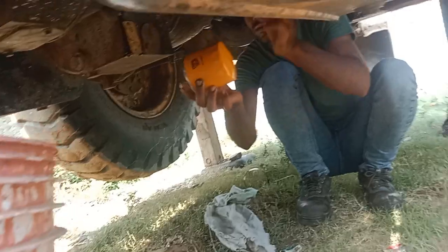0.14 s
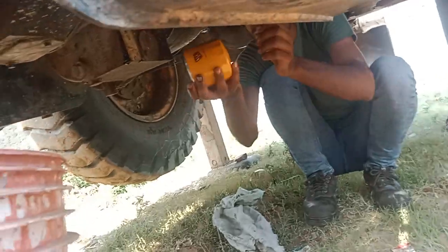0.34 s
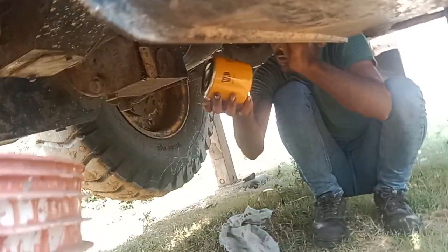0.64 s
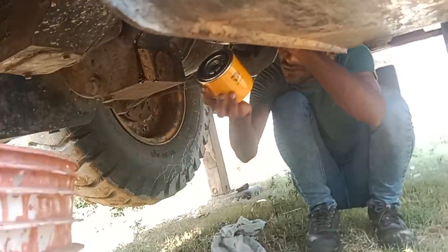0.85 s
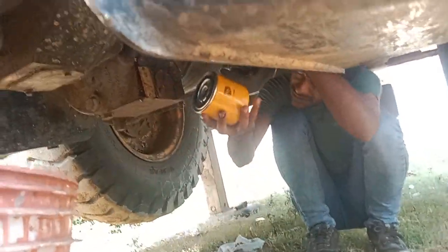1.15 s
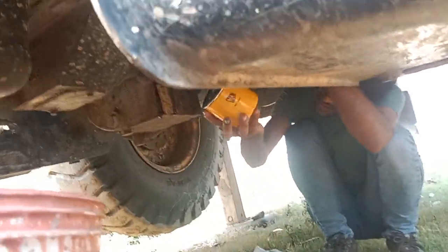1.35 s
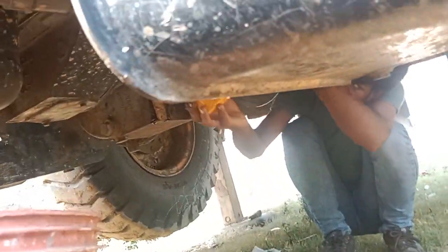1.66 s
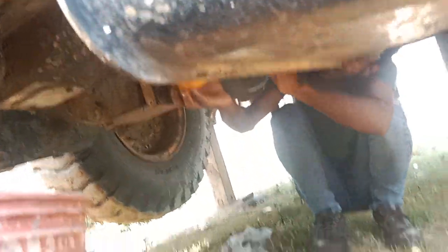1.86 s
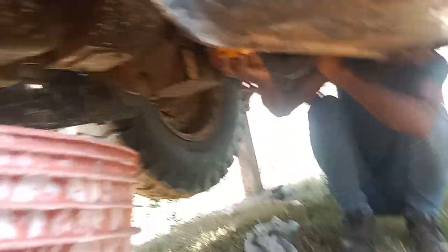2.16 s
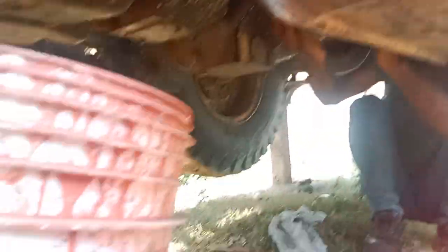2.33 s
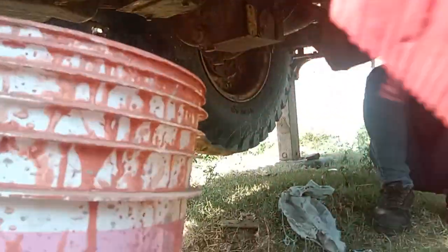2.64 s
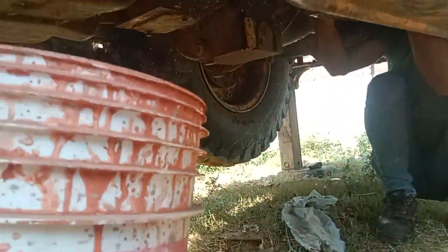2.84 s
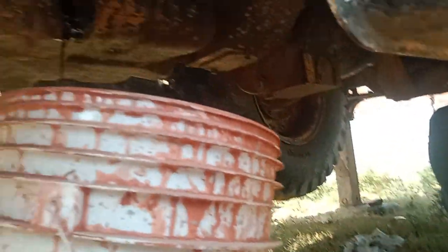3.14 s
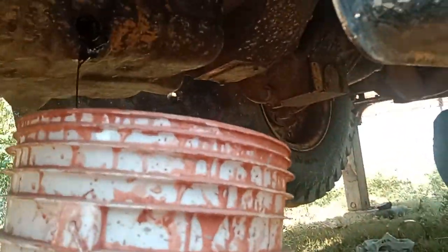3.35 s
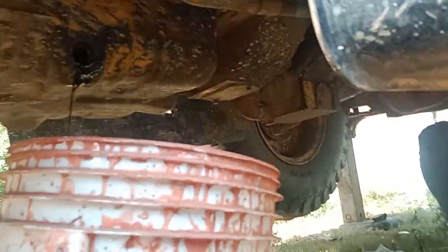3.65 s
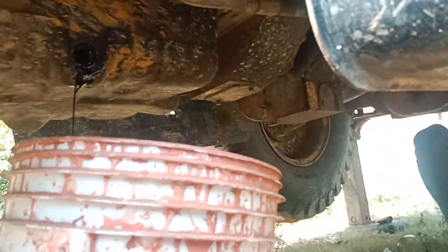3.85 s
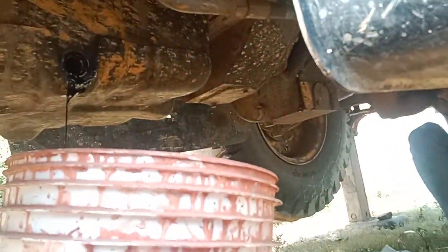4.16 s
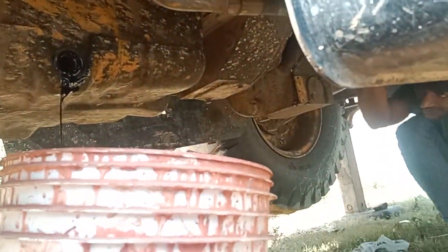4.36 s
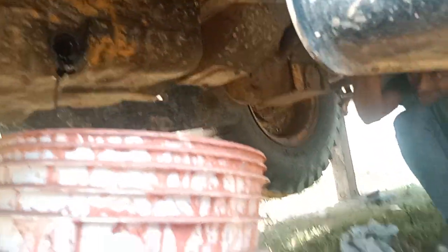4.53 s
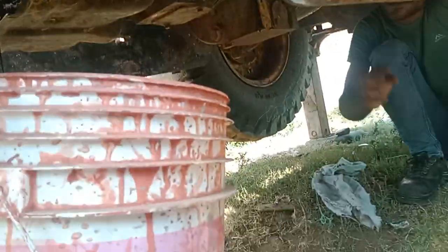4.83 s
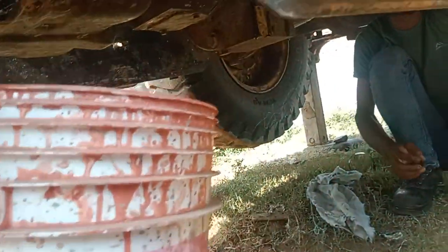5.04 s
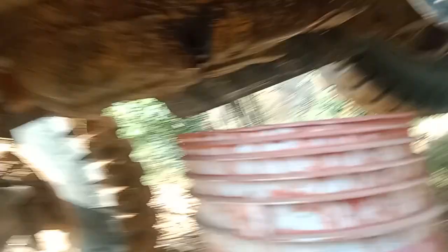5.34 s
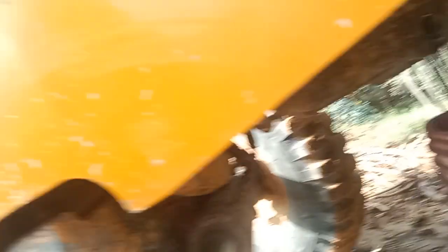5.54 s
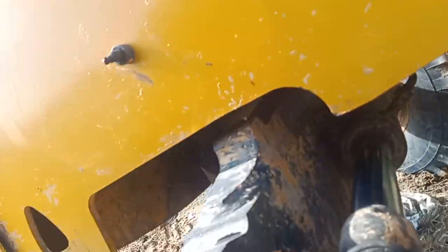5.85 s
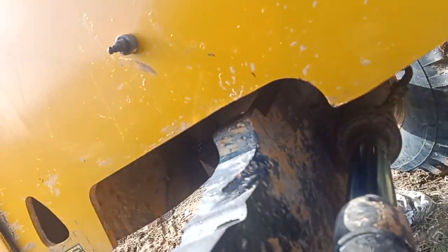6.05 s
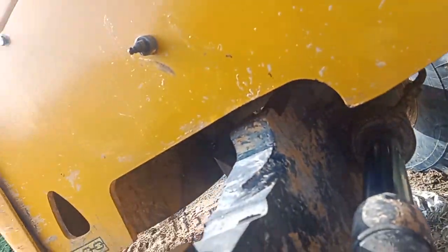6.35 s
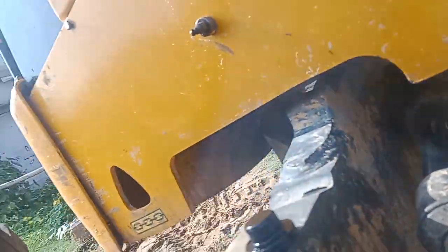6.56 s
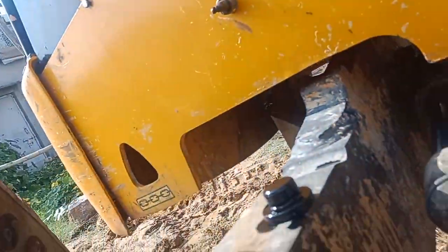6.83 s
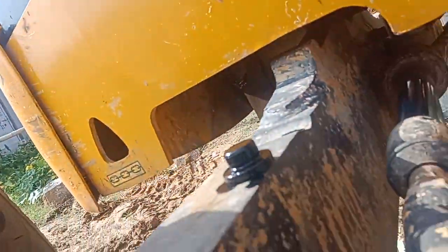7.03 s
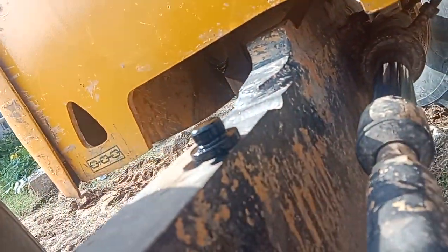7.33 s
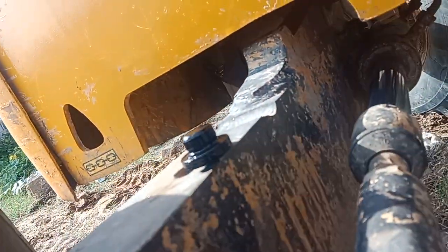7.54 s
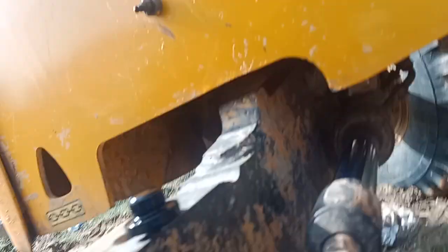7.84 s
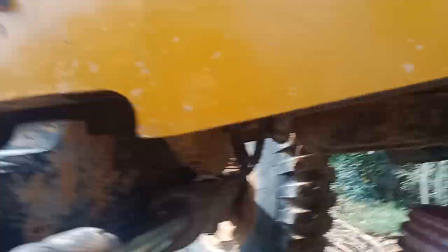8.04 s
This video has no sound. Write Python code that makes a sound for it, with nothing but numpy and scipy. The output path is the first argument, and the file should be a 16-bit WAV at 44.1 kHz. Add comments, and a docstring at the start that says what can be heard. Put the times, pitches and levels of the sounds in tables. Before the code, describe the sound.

Outdoors beneath a digger, heard by a hand-held phone with dulled treble and patchy quiet noise. Low, unsteady air rumble runs throughout, under faint high insect hiss. Cloth and grass swish at 0.2 and 0.6 s, with thin whistles coming and going until 1.7. Loud steel clanks hit at 1.0 and 1.35 s, crashing sharply then ringing with a short dull echo. A low engine-like hum swells around 2 s. At 2.7-2.9 a close sleeve rubs and fingers bump the case. A small knock follows at 3.2; very faint oil plips are nearest around 3.6, while the air flutter weakens. From 5.1 dry crackles and clicks gather; light knocks, hoarse scrapes and a loose steel clack come at 5.7-6.3. A soft thump at 7.0, a gritty grip slide near 7.6, then gusts and heavy double thumps at 8.0-8.2.

```python
"""Outdoors under a digger, a hand-held phone hears a thin thread of engine oil patter into a plastic bucket.
Steel clanks twice as a filter is fitted (decaying modes over a noise crash); small things knock, and the steel
clacks lightly after a short scrape. A close sleeve rubs, cloth and grass swish, dry stalks crackle: shaped
noise and clicks. Fingers thump the case near the end. Air buffets the microphone all along as wandering
resonances, a low hum swells, thin wavering whistles come and go, and insects hiss in a high noise band."""
import sys
import numpy as np
from scipy import signal
from scipy.fft import rfft, irfft, dct, next_fast_len
from scipy.io import wavfile
from scipy.ndimage import uniform_filter1d

SR = 44100
rng = np.random.default_rng(int(sys.argv[2]) if len(sys.argv) > 2 else 0)


def output_pcm(signal):
    """Save a mono or channel-first signal as 16-bit PCM at the path in sys.argv[1].

    Samples are clipped to [-1, 1] before scaling.
    """
    pcm = np.clip(np.atleast_2d(signal).T, -1, 1) * 32767
    wavfile.write(sys.argv[1], SR, np.round(pcm).astype(np.int16))


N = 361205
TIME = np.arange(N) / SR  # seconds

# Steel under the machine. Each row: frequency in Hz, 60 dB decay in s, then relative level in dB
# when struck at the first spot and at the second.
STEEL_MODES = [(554,0.55,-25,-38), (590,0.34,-23,-30), (684,0.12,-28,-28), (827,0.2,-35,-30),
               (980,0.11,-18,-22), (992,0.5,-27,-32), (1354,1.5,-25.5,-35), (1564,0.33,-25,-39),
               (1628,0.16,-27,-39), (1677,0.28,-28,-42), (1795,0.19,-30,-43), (1930,0.18,-25,-44),
               (2358,0.25,-44,-33), (2494,0.5,-28,-42), (2560,0.17,-33,-23), (3076,0.27,-48,-25.5),
               (3574,0.165,-25,-35), (4182,0.17,-35,-40), (4370,0.19,-34,-44), (4830,0.09,-32,-37),
               (5765,0.13,-42,-35), (7020,0.11,-47,-34)]
# The two blows. Each row: start in seconds, ring gain in dB, crash level in dB, crash 60 dB decay in s.
CLANKS = [(0.9836, -0.5, -7, 0.039), (1.3505, 1.5, -15, 0.087)]
# Dense, short modes, one list for each spot struck. Each row: frequency in Hz, relative level in dB.
CRASH_COLOURS = [
    [(250, -38), (600, -19.5), (1000, 10.5), (1250, -17), (1800, -2), (2700, -22), (3700, -6.5),
     (5500, -19.5), (8200, -25)],
    [(250, -32.5), (650, 7.5), (1000, -1.5), (1500, -9.5), (2100, -18.5), (2700, -3.5), (3700, -7.5),
     (5500, -10.5), (8200, -21)],
]
CLANK_RISE_S = 0.0016

# Thumps on the phone's case. Each row: start in seconds, level in dB, frequency in Hz, 60 dB decay in s.
THUMPS = [(2.837, -9.5, 159, 0.033), (2.865, -9, 225, 0.027), (2.874, -16.5, 115, 0.079),
          (6.978, -17, 144, 0.078), (8.035, -2, 198, 0.041), (8.049, -4, 233, 0.027),
          (8.141, -2.5, 320, 0.016), (8.159, -9, 166, 0.03)]

# Tools and bucket knocked, and the steel bouncing once after its clack. Each row: start in seconds, level in
# dB, body frequency in Hz, body 60 dB decay in s, bright clatter in dB relative to the knock.
KNOCKS = [(1.892, -39, 943, 0.25, -10.5), (2.677, -29.5, 1046, 0.11, -22.5), (3.222, -25, 900, 0.046, -0.5),
          (5.735, -36, 1123, 0.12, -8), (5.972, -32, 583, 0.17, -9.5)]
# The steel clacks at a light blow. Each row: start in seconds, level in dB.
CLACKS = [(5.9515, -34.5)]
# Modes the steel rings with at a light blow or a bright knock. Each row: frequency in Hz, relative level in dB,
# 60 dB decay in s.
CLATTER_MODES = [(588.4, -0.5, 0.28), (674, -11, 0.15), (987, 0, 0.16), (1335, -5.5, 0.38),
                 (2470, -18.5, 0.14), (4120, -12.5, 0.4), (4280, -19, 0.28), (4500, -12, 0.31),
                 (5740, -10.5, 0.078), (6430, -2, 0.065), (7780, -13, 0.072)]
# Hoarse scrapes. Each row: start and end in seconds, first and last frequency in Hz, width in Hz, level in dB.
SCRAPES = [(5.73, 5.836, 1610, 1340, 200, -50.5), (5.74, 5.916, 1158, 1280, 110.5, -51.5),
           (5.835, 6.116, 3490, 3340, 170.6, -57), (6.163, 6.342, 1305, 1276, 70, -48),
           (6.875, 7.14, 1330, 1270, 70, -54.5), (3.446, 3.581, 895, 808, 77.7, -50)]

# The close sleeve catches on the phone, drags and slips off. Each row: start in seconds, drag in seconds,
# level of the dull rub in dB, level of the rasp in dB.
SLEEVE_DRAGS = [(2.735, 0.03, -37.5, -54.5), (2.775, 0.061, -38.5, -47), (2.831, 0.026, -35, -46.5),
                (2.881, 0.028, -53, -41)]
# Colours of the dull rub and of the rasp. Each row: frequency in Hz, relative level in dB.
RUB_COLOUR = [(300, -5.5), (420, -5.5), (800, -16), (1500, -25.5)]
RASP_COLOUR = [(900, -10), (1500, 1.5), (3000, 0), (8200, -9)]
SLEEVE_ATTACK_S, SLEEVE_T60_S = 0.0033, 0.22
# Shuffling near the phone. Each row: middle in seconds, length in seconds, level in dB.
MOVES = [(1.3, 2.9, -58), (2.638, 0.29, -53), (3.165, 0.61, -57.5), (6.09, 0.67, -53), (6.995, 0.85, -64)]
STILL_DB = -70.5  # rustle between the moves
# Resonances of the shuffling. Each row: frequency in Hz, width in Hz, relative level in dB.
RUSTLE_MODES = [(1298, 77, 1.5), (1400, 600, 0), (2607, 500, -6), (3470, 400, -4.5), (7300, 990, -7)]
# The grip slides on the case. Each row: middle in seconds, length in seconds, level in dB.
SLIDES = [(7.6, 0.43, -50.5), (8.08, 0.51, -54.5)]
# Resonances of that slide. Each row: frequency in Hz, width in Hz, relative level in dB.
SLIDE_MODES = [(450, 170, -6), (1031, 42, -5.5), (1490, 470, 4), (2460, 350, -2.5), (3440, 900, -8.5),
               (5240, 380, -7.5), (6880, 500, -11)]
# Cloth and grass brush past. Each row: middle in seconds, length in seconds, level in dB, lower edge in Hz.
SWISHES = [(0.197, 0.45, -55.5, 4000), (0.641, 0.36, -47.5, 2030), (1.959, 0.14, -51.5, 2000),
           (2.107, 0.074, -53, 2000), (4.815, 0.042, -52.5, 3540), (5.259, 0.082, -53.5, 3900),
           (6.178, 0.056, -48.5, 1980)]
# Colour of the swishes. Each row: frequency in Hz, relative level in dB.
SWISH_COLOUR = [(3000, 6.5), (4600, 3.5), (7000, 7), (8400, 4), (15000, -10.5)]

# Grit and dry stalks underfoot. Each row: start in seconds, level in dB, centre in Hz.
CRACKLES = [(0.3418, -44, 3160), (0.515, -45, 6440), (0.5601, -52, 2690), (2.36, -47, 7000),
            (2.6437, -49.5, 3320), (3.321, -53, 3370), (5.139, -47.5, 8000), (5.172, -49, 7400),
            (5.1951, -56, 4500), (5.307, -51, 2570), (5.5718, -45.5, 7330), (5.618, -48, 2250),
            (5.6383, -53, 2060), (5.731, -40, 2530), (5.998, -54, 4040), (6.065, -47, 3890),
            (6.338, -51.5, 3860), (6.442, -46.5, 3590), (6.9494, -47, 4210), (7.095, -38.5, 3470),
            (7.119, -53, 2590), (7.255, -47.5, 2370), (7.602, -46, 6750)]
# Sharp, broad clicks of things handled. Each row: start in seconds, level in dB.
CLICKS = [(0.39, -38), (2.836, -41), (5.3158, -38), (6.16, -46)]
# Colour of clicks and of bright knocks. Each row: frequency in Hz, relative level in dB.
TICK_COLOUR = [(1200, -1.5), (3000, 3.5), (8200, 0.5), (15000, -0.5)]
TICK_T60_S = 0.12
TICKING_DB = -51.5  # the strongest ticks of dry grass

OIL_DB, OIL_HZ = -69.5, 1060  # level before the bucket's distance is applied, middle pitch

# Eddies round the phone, deepest first. Each row: frequency in Hz, width in Hz, relative level in dB.
BASS_EDDIES = [(51.7, 15, -21), (90.8, 20, 2)]
LOW_EDDIES = [(128.3, 18, 0.5), (165.5, 29, -1), (214.7, 30, -9.5)]
HIGH_EDDIES = [(260.7, 36, 0.5), (303, 22, 0.5), (347, 50, -4), (392, 26, -15.5), (525, 230, -13.5)]
# Levels of the deepest and of the highest eddies between gusts. Each row: time in seconds, level in dB.
BASS_LEVEL = [(0, -46.5), (1.1, -38.5), (3, -42.5), (4.6, -46), (5.8, -40.5), (8.19, -36.5)]
FLUTTER_LEVEL = [(0, -40), (1.4, -39), (1.8, -42), (2.6, -40.5), (3.2, -46), (4.3, -53), (5.45, -51.5),
                 (6.6, -62), (7.7, -54), (8.19, -44.5)]
BREEZE_DB = -35.5  # low eddies between gusts
# Gusts. Each row: middle in seconds, length in seconds, rise in dB.
GUSTS = [(7.746, 0.17, 8.5), (8.036, 0.2, 15), (8.163, 0.044, 10)]
# Lulls. Each row: middle in seconds, length in seconds, drop in dB.
LULLS = [(1.744, 0.07, 7.5), (4.368, 0.077, 14.5), (4.585, 0.26, 6.5), (4.864, 0.17, 8.5),
         (5.097, 0.23, 7.5), (7.181, 0.13, 4), (7.868, 0.25, 10.5)]
FLUTTER_SWING = 1.21  # dB the high eddies move for each dB of a gust or lull
# Broad, soft wash of air. Each row: frequency in Hz, relative level in dB.
WASH_COLOUR = [(300, -4.5), (430, 3), (520, 1.5), (620, -8), (700, -24), (820, -14.5), (1100, -21),
               (2000, -32.5)]
WASH_DB = -41  # when the high eddies are at their strongest, between gusts
WASH_SWING = 2.9  # dB the wash moves for each dB of FLUTTER_LEVEL

DRONE_S, DRONE_LENGTH_S, DRONE_HZ = 1.99, 1.9, 46.66  # middle, length, fundamental of the low hum
# Partials of the hum. Each row: multiple of the fundamental, level in dB.
DRONE_PARTIALS = [(1, -43.5), (4, -38)]

# Thin whistles and squeaks. Each row: start and end in seconds, first and last frequency in Hz, level in dB.
WHISTLES = [(-.06, 0.104, 5500, 5480, -52.5), (0.084, 0.322, 5540, 5540, -57),
            (0.245, 1.1, 2670, 2667, -51), (0.256, 0.41, 3109, 3100, -52), (0.626, 0.96, 3095, 3046, -54.5),
            (1.212, 1.671, 2720, 2670, -48.5), (1.24, 1.673, 3150, 3110, -57.5),
            (5.849, 5.982, 2960, 2920, -51.5), (6.607, 7.172, 5860, 5620, -61),
            (6.666, 6.954, 3090, 3120, -63.5)]

# Quiet open air. Each row: frequency in Hz, relative level in dB.
AIR_COLOUR = [(400, -9.5), (750, -2), (1300, 4), (1900, -5.5), (3300, -8.5), (5500, -6.5), (8400, -21.5),
              (15000, -13.5)]
AIR_DB = -69
# Insects over time, before their trim. Each row: time in seconds, level in dB.
INSECT_LEVEL = [(0, -59.5), (1.2, -52), (1.6, -66.5), (2.6, -57), (3.3, -61.5), (3.8, -71), (6.1, -63.5),
                (8.19, -63)]
# Colour of the insects. Each row: frequency in Hz, relative level in dB.
INSECT_COLOUR = [(5500, -66.5), (6700, 25.5), (7400, 21.5), (8400, 16.5), (9200, -38)]

# Treble response of the microphone. Each row: frequency in Hz, gain in dB.
MIC_SHELF = [(8400, 0), (9400, -13.5)]
TOP_HZ = 15500  # nothing much is passed above this
RAGGED_DB = 9  # reach of chance resonances in a colour, up and down


def clanks(tail_db=-20, tail_t60=0.52, dull_hz=1800, dull_db=-11):
    """Each blow rings the steel modes as weighted by its spot, over a crash with a duller chassis echo."""
    out, t = np.zeros(N), TIME[:int(1.5 * SR)]
    rise = 1 - np.exp(-t / CLANK_RISE_S)
    for spot, (start, ring_db, crash_db, t60) in enumerate(CLANKS):
        ring = 0
        for hz, life, *db in STEEL_MODES:
            chatter = 1 + min(hz / 5000, 1) * walk(160)[:len(t)]  # upper modes are the most uneven
            tone = np.sin(2 * np.pi * (hz * t + rng.random()))
            ring = ring + undb(db[spot]) * fade(t, life) * chatter * tone
        # the echo loses dull_db for each octave above dull_hz
        dull = [(hz, db + dull_db * max(np.log2(hz / dull_hz), 0)) for hz, db in CRASH_COLOURS[spot]]
        echo = undb(tail_db) * noise(dull, size=len(t), ragged_db=RAGGED_DB) * fade(t, tail_t60)
        crash = noise(CRASH_COLOURS[spot], size=len(t)) * fade(t, t60) + echo
        add(out, start, (undb(ring_db) * ring + undb(crash_db) * crash) * rise)
    return out


def thumps(rise_s=0.0027):
    """Fingers bump the phone's case: each bump is a few cycles of a damped low tone."""
    out, t = np.zeros(N), TIME[:SR // 4]
    rise = 1 - np.exp(-t / rise_s)
    for start, db, hz, t60 in THUMPS:
        add(out, start, undb(db) * np.sin(2 * np.pi * hz * t) * fade(t, t60) * rise)
    return out


def knocks(tail_db=-22, tail_t60=0.48, hiss_db=-11, rise_s=0.0025):
    """A damped body resonance with bright metal clatter and a short echo; the steel also clacks alone."""
    out, t = np.zeros(N), TIME[:SR // 2]
    attack = 1 - np.exp(-t / rise_s)
    for start, db, hz, t60, bright_db in KNOCKS:
        body_colour = [(hz * .5, -22), (hz * .85, -7), (hz, 0), (hz * 1.08, -9), (hz * 2.5, -32)]
        body = noise(body_colour, size=len(t))
        hiss = undb(hiss_db + bright_db) * noise(TICK_COLOUR, size=len(t))
        blow = (body + hiss) * (fade(t, t60) + undb(tail_db) * fade(t, tail_t60))
        metal = undb(bright_db) * clatter(t, hz) * fade(t, 2 * t60)
        add(out, start, undb(db) * attack * (blow + metal))
    for start, db in CLACKS:
        add(out, start, undb(db) * attack * clatter(t))
    return out


def clatter(t, lowest_hz=0, rough=0.66):
    """Metal struck lightly rings unevenly in its modes; a glancing touch wakes only upper ones."""
    out = 0
    for hz, db, t60 in CLATTER_MODES:
        if hz > lowest_hz:
            rattle = 1 + rough * walk(260)[:len(t)]
            out = out + undb(db) * fade(t, t60) * rattle * np.sin(2 * np.pi * (hz * t + rng.random()))
    return out


def scrapes():
    """Short, hoarse slides: friction noise in one resonance that glides."""
    out = 0
    for start, end, first_hz, last_hz, width_hz, db in SCRAPES:
        progress = np.clip((TIME - start) / (end - start), 0, 1)
        phase = 2 * np.pi * np.cumsum(first_hz + (last_hz - first_hz) * progress) / SR
        band = walk(2 * width_hz) * np.cos(phase) + walk(2 * width_hz) * np.sin(phase)
        out = out + undb(db) * np.sin(np.pi * progress) * band
    return out


def rustles(flicker_db=5):
    """Fibres catch and slip: shuffling, and one close sleeve with a dull rub and a rasp."""
    shuffle = resonant(RUSTLE_MODES, flicker_db, rate=24) * effort()
    rub_level = sum(undb(db) * drag(start, length) for start, length, db, _ in SLEEVE_DRAGS)
    rasp_level = sum(undb(db) * drag(start, length) for start, length, _, db in SLEEVE_DRAGS)
    rub = noise(RUB_COLOUR) * rub_level
    rasp = grit(RASP_COLOUR, spread_db=1, rate=9500) * rasp_level
    grain_db = 2.5 * walk(220)
    return shuffle + (rub + rasp) * undb(grain_db)


def effort():
    """Strength of the shuffling: separate moves over near stillness, added as powers."""
    moves_power = sum((undb(db) * swell(middle, length)) ** 2 for middle, length, db in MOVES)
    return np.sqrt(undb(STILL_DB) ** 2 + moves_power)


def drag(start, length):
    """Strength of one drag: cloth catches quickly, drags evenly and dies away."""
    t = np.maximum(TIME - start, 0)
    return (1 - np.exp(-t / SLEEVE_ATTACK_S)) * fade(np.maximum(t - length, 0), SLEEVE_T60_S)


def slide(flicker_db=3):
    """The grip slides on the case: sets of narrow resonances come and go inside the broad ones."""
    rubbing = resonant(SLIDE_MODES, flicker_db, rate=18)
    flat = [(300, 0), (9000, 0)]
    sets = np.array([tint(rubbing, flat, RAGGED_DB * .7) for _ in range(6)])
    shares = np.array([np.exp(2 * walk(14)) for _ in sets])
    blend = (sets * shares).sum(axis=0) / shares.sum(axis=0)
    return blend * sum(undb(db) * swell(middle, length) for middle, length, db in SLIDES)


def swishes():
    """Cloth and grass brush past in grains; each stroke has its own resonances and lower edge."""
    out = 0
    for middle, length, db, low_hz in SWISHES:
        colour = [(low_hz * .5, -20)]
        for hz, weight in SWISH_COLOUR:
            octaves_below = max(np.log2(low_hz / hz), 0)
            colour.append((hz, weight - 40 * octaves_below))
        grains = grit(colour, spread_db=-6, rate=2700, ragged_db=RAGGED_DB / 2)
        out = out + grains * undb(db) * swell(middle, length)
    catching_db = 2 * walk(55)
    return out * undb(catching_db)


def crackles(tick_db=-10, count=100):
    """Snaps underfoot, sharp clicks of handling, and dry grass ticking finely at chance moments."""
    out, t = np.zeros(N), TIME[:SR // 8]
    for start, db, hz in CRACKLES:
        add(out, start, undb(db) * snap(hz))
    for start, db in CLICKS:
        click = noise(TICK_COLOUR, size=len(t), ragged_db=RAGGED_DB) * fade(t, TICK_T60_S)
        add(out, start, undb(db) * click)
    for when, pitch, weakness in rng.random((count, 3)):
        hz = 6800 + 1400 * pitch
        add(out, when * N / SR, undb(TICKING_DB + tick_db * weakness) * snap(hz, t60=0.081))
    return out


def snap(hz, t60=0.14):
    """A stalk or grain of grit snaps: a brief main resonance among weaker ones of its own."""
    t = TIME[:SR // 8]
    rise_s = .0009
    colour = [(hz * .5, -33), (hz * .85, -16), (hz, 0), (hz * 1.12, -15), (hz * 1.6, -33)]
    return noise(colour, size=len(t), ragged_db=RAGGED_DB) * fade(t, t60) * (1 - np.exp(-t / rise_s))


def oil(count=1600, t60=0.0058):
    """The viscous thread folds into the pool with tiny damped plips, loudest while the bucket is close."""
    out, t = np.zeros(N), TIME[:SR // 20]
    for when, pitch, weakness in rng.random((count, 3)):
        hz = OIL_HZ * 2 ** (1.2 * (pitch - .5))
        add(out, when * N / SR, undb(-14 * weakness) * np.sin(2 * np.pi * hz * t) * fade(t, t60))
    nearness = 0.23 + 1.1 * np.exp(-((TIME - 3.6) / 1.7) ** 2)  # closest at 3.6 s
    return out / np.std(out) * undb(OIL_DB) * nearness


def buffet(unrest_db=2.5):
    """Air rumbles on the microphone port under a soft wash; gusts swell it and reach higher, lulls drop it."""
    rise_db = sum(db * swell(middle, length) for middle, length, db in GUSTS)
    drop_db = sum(db * swell(middle, length) for middle, length, db in LULLS)
    gust_db = rise_db - drop_db
    flutter_db = curve(FLUTTER_LEVEL)
    weak_db = flutter_db - flutter_db.max()
    fitful_db = unrest_db * walk(7.6) * np.tanh(-weak_db / 10)  # weak eddies come and go
    bass = eddies(BASS_EDDIES) * undb(curve(BASS_LEVEL) + gust_db)
    low = eddies(LOW_EDDIES) * undb(BREEZE_DB + gust_db)
    high = eddies(HIGH_EDDIES) * undb(flutter_db + FLUTTER_SWING * gust_db + fitful_db)
    wash = noise(WASH_COLOUR) * undb(WASH_DB + WASH_SWING * weak_db + gust_db)
    return bass + low + high + wash


def eddies(modes, even_s=.07):
    """Turbulence whose pitch wanders while its strength stays even over a short while."""
    x = resonant(modes, flicker_db=4.5, rate=12)
    return x / np.sqrt(uniform_filter1d(x ** 2, int(even_s * SR)) + 0.066)


def drone(waver=0.025):
    """A low, wavering hum of a few partials, like a far engine, swells and fades."""
    phase = 2 * np.pi * np.cumsum(DRONE_HZ * (1 + waver * walk(8))) / SR
    hum = sum(undb(db) * np.sin(round(multiple) * phase) for multiple, db in DRONE_PARTIALS)
    return swell(DRONE_S, DRONE_LENGTH_S) * hum


def whistles(waver=0.0065):
    """Thin gliding tones set in quickly, waver in pitch and trill unevenly in level."""
    out = 0
    for start, end, first_hz, last_hz, db in WHISTLES:
        progress = np.clip((TIME - start) / (end - start), 0, 1)
        hz = (first_hz + (last_hz - first_hz) * progress) * (1 + waver * walk(220))
        trill_phase = 2 * np.pi * np.cumsum(26 + 8 * walk(20)) / SR  # near 26 trills a second
        trill_db = 4 * np.sin(trill_phase) + 2 * walk(90)
        envelope = np.sqrt(abs(np.sin(np.pi * progress)))
        out = out + undb(db + trill_db) * envelope * np.sin(2 * np.pi * np.cumsum(hz) / SR)
    return out


def outdoors(insect_db=-2):
    """Quiet open air as steady noise, and a few insects as a high hiss that comes and goes."""
    insects = sum(noise(INSECT_COLOUR) * undb(4.5 * walk(rate)) for rate in (14, 45)) / 2
    return noise(AIR_COLOUR) * undb(AIR_DB) + insects * undb(curve(INSECT_LEVEL) + insect_db)


def undb(db):
    """Decibels to gain."""
    return 10 ** (np.asarray(db) / 20)


def curve(rows, column=1):
    """A column of a table, joined by straight lines in time."""
    rows = np.array(rows)
    return np.interp(TIME, rows[:, 0], rows[:, column])


def tint(x, points, ragged_db=0):
    """Filter x by (Hz, dB) points, falling 20 dB an octave beyond them, with chance resonances; rms 1."""
    hz, db = np.transpose(points)
    size = next_fast_len(len(x), True)
    bins = np.fft.rfftfreq(size, 1 / SR)
    octave = np.log2(np.maximum(bins, 1))
    beyond = np.maximum(np.log2(hz[0]) - octave, 0) + np.maximum(octave - np.log2(hz[-1]), 0)
    spots = np.arange(0, SR, 230)  # Hz
    ripple = ragged_db * np.interp(bins, spots, rng.uniform(-1, 1, len(spots)))
    gain = undb(np.interp(octave, np.log2(hz), db) - 20 * beyond + ripple)
    y = irfft(rfft(x, size) * gain, size)[:len(x)]
    return y / np.std(y)


def noise(points, size=N, ragged_db=0):
    """Coloured noise of rms near 1."""
    return tint(rng.standard_normal(next_fast_len(size, True)), points, ragged_db)[:size]


def grit(points, spread_db, rate, ragged_db=0):
    """Dense tiny clicks of uneven size, about rate a second, coloured; rms near 1."""
    size = next_fast_len(N, True)
    sizes = undb(spread_db * np.minimum(rng.exponential(size=size), 5))
    clicks = rng.standard_normal(size) * sizes * (rng.random(size) < rate / SR)
    return tint(clicks, points, ragged_db)[:N]


def resonant(modes, flicker_db, rate):
    """Noise in resonances of (Hz, width Hz, dB); each one swells and fades on its own; rms 1."""
    size, out = next_fast_len(N, True), 0
    bins = np.fft.rfftfreq(size, 1 / SR)
    for hz, width, db in modes:
        response = 1 / (1 + ((bins - hz) / width) ** 2) ** 2
        band = irfft(rfft(rng.standard_normal(size)) * response, size)[:N]
        out = out + band / np.std(band) * undb(db + flicker_db * walk(rate))
    return out / np.std(out)


def walk(rate):
    """Slow chance: normal random values, rate of them a second, joined by straight lines."""
    steps = rng.standard_normal(2 ** 14)
    return np.interp(TIME * rate, np.arange(len(steps)), steps)


def fade(t, t60):
    """Exponential decay, down 60 dB after t60 seconds."""
    return np.exp(-np.log(1000) * t / t60)


def swell(middle, length):
    """A smooth rise and fall round a middle in seconds; top 1."""
    return np.exp(-(2 * (TIME - middle) / length) ** 2)


def add(out, start, sound):
    """Mix a sound in from a start in seconds."""
    i = max(int(start * SR), 0)
    out[i:i + len(sound)] += sound[:max(N - i, 0)]


def suppress(x, size=1024, threshold_db=5.5, slope=0.33):
    """Turn down each band that does not stand above its own running level, so quiet noise turns patchy."""
    padded = np.pad(x, ((0, 0), (0, size)), "reflect", reflect_type="odd")
    _, _, bands = signal.stft(padded, nperseg=size, noverlap=3 * size // 4)
    power = uniform_filter1d(abs(bands) ** 2, size=3, axis=-2)  # across bands
    power = uniform_filter1d(power, size=5, axis=-1).clip(1e-20)  # along time
    usual = np.exp(uniform_filter1d(np.log(power), size=121, axis=-1))
    deepest = undb(-7)
    gain = np.clip((power / usual / undb(2 * threshold_db)) ** slope, deepest, 1)
    return signal.istft(bands * gain, nperseg=size, noverlap=3 * size // 4)[1][..., :N]


def scene():
    """Everything arrives at the one microphone."""
    handling = thumps() + rustles() + slide() + swishes()
    metal = clanks() + knocks() + scrapes()
    air = buffet() + drone() + whistles() + outdoors()
    return (metal + handling + crackles() + oil() + air)[None]


def record(dry):
    """The phone dulls the treble, suppresses steady noise, rounds the loudest peaks and cuts the top."""
    bin_hz = np.arange(N) * SR / (2 * N)
    shelf = undb(np.interp(bin_hz, *np.transpose(MIC_SHELF)))
    heard = dct(dct(dry, norm="ortho") * shelf, type=3, norm="ortho")
    rounded = .65 * np.tanh(suppress(heard) / .65)
    fade_out = np.minimum((TIME[-1] - TIME) / .004, 1)  # the last 4 ms
    top_cut = signal.ellip(8, .2, 70, TOP_HZ, fs=SR, output="sos")
    return signal.sosfilt(top_cut, rounded * fade_out)


dry = scene()
out = record(dry)
output_pcm(out)
```